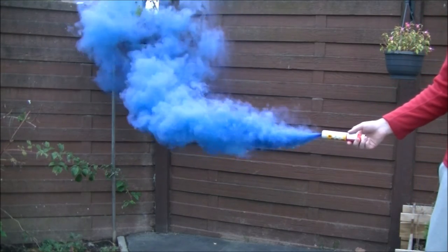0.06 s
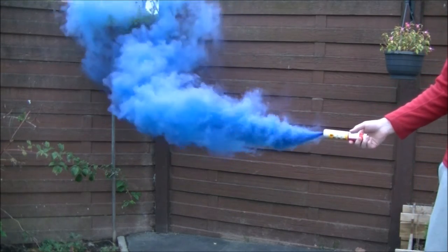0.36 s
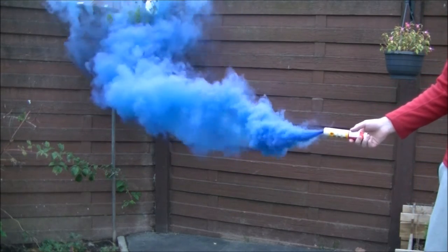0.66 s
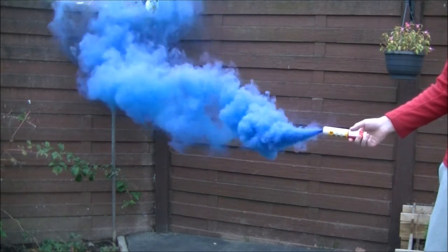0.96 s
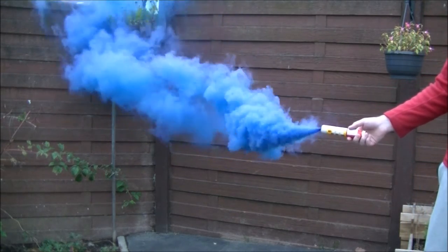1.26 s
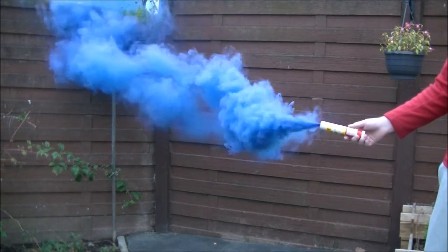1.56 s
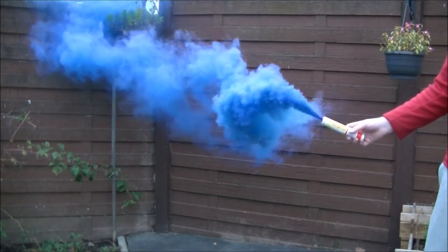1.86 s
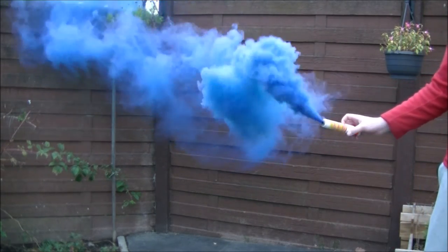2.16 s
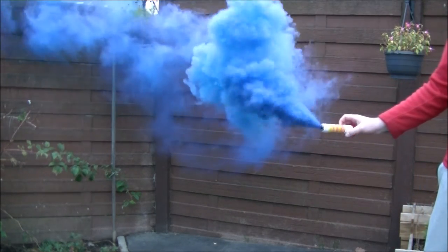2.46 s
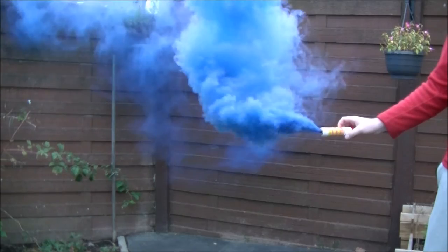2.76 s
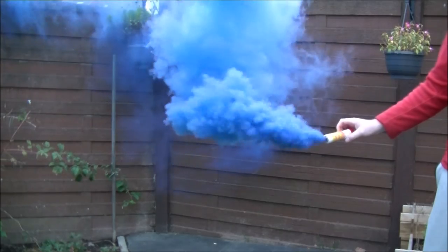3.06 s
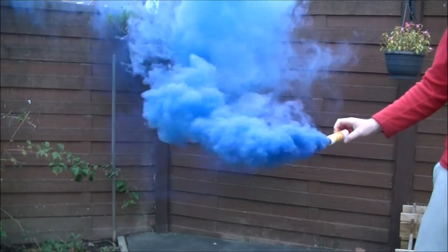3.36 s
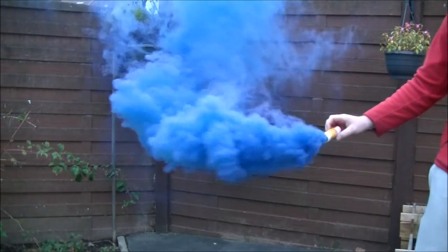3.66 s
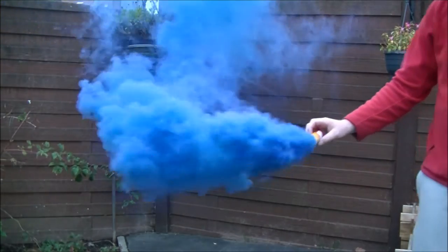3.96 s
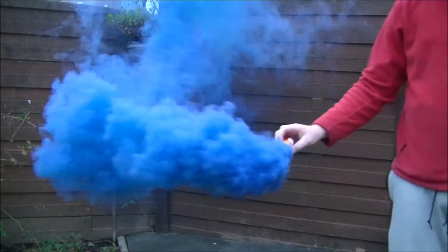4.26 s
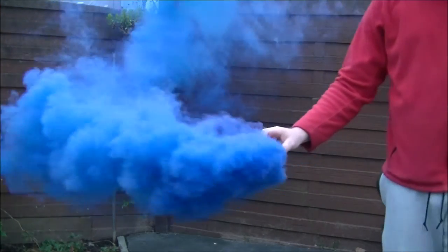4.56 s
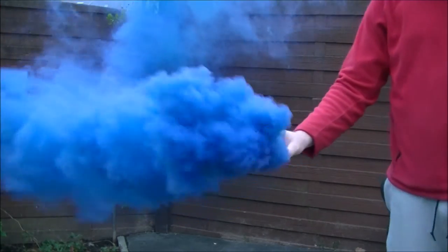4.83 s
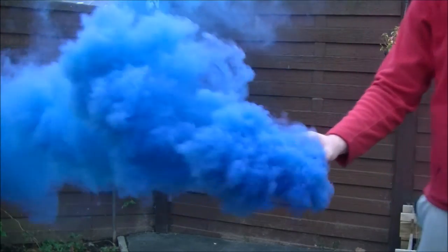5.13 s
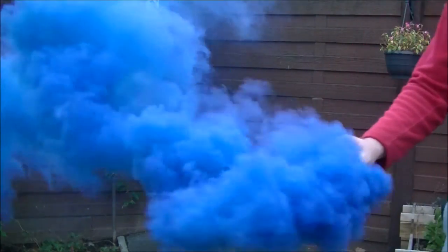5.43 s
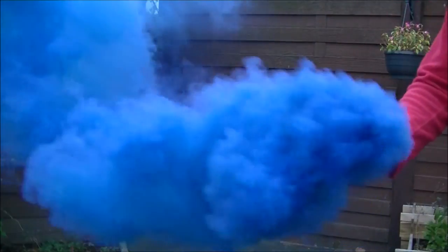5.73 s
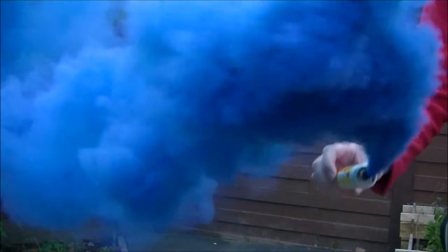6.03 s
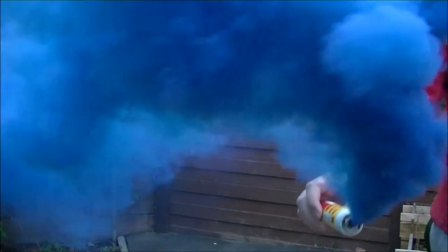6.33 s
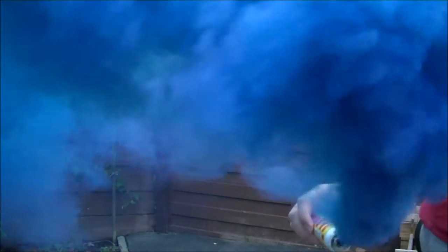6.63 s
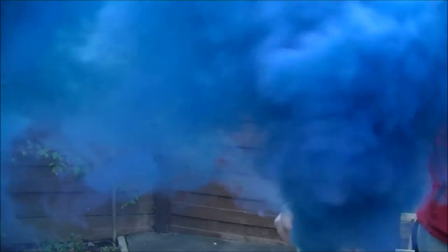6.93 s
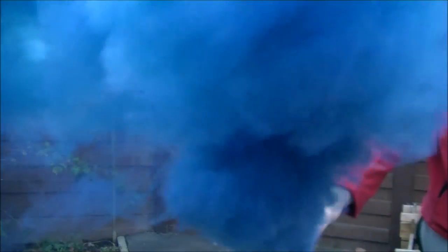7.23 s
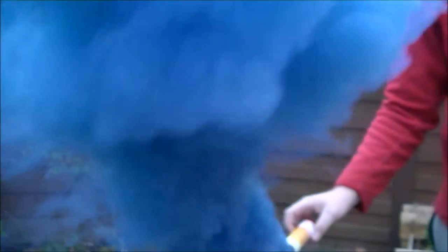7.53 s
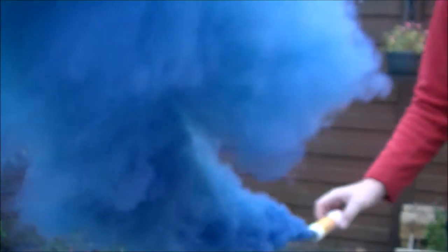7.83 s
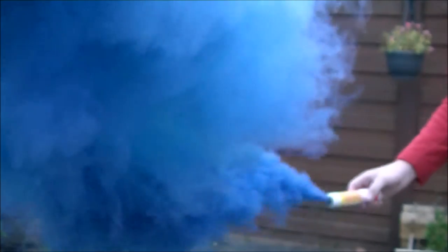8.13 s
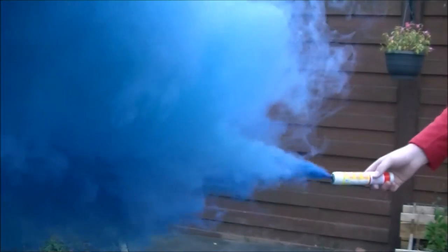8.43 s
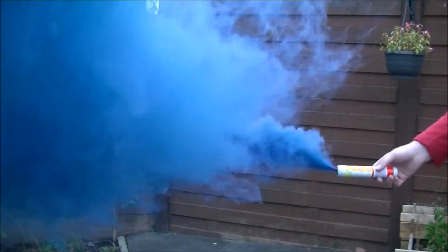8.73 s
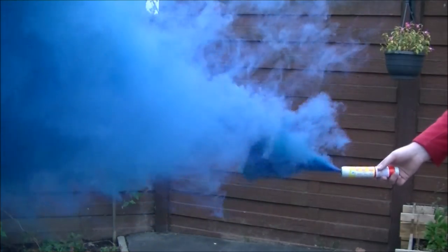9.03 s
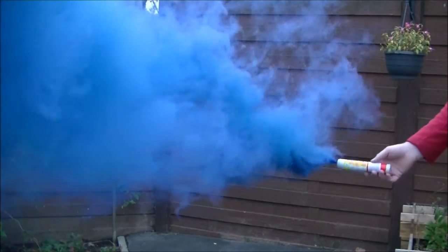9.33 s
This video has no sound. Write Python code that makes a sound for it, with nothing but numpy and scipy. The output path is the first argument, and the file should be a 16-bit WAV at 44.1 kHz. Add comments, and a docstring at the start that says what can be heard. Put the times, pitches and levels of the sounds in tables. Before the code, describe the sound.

The steady, bright hiss of a smoke grenade jetting in a garden, with a slow phasing sweep and a louder close pass.

```python
"""A hand-held smoke grenade jets in a fenced garden, its turbulent plume roaring, its nozzle hissing.
From the start the paving's echo combs the noise into a slow phasing sweep, wooden fences add short
echoes, and far-off cars pull away over a town rumble. The plume billows at 2 s. Swung towards the
microphone, the jet grows louder and spits just before it is closest, at 6 s. On the way back it
billows again, spits once more near 7.8 s and settles to a softer hiss."""
import sys
import numpy as np
from scipy import signal
from scipy.fft import rfft, irfft, next_fast_len
from scipy.io import wavfile
from scipy.ndimage import uniform_filter1d, map_coordinates

SR = 44100
rng = np.random.default_rng(int(sys.argv[2]) if len(sys.argv) > 2 else 0)


def bounce(signal):
    """Save signal as a 16-bit WAV file at the path given by the first command-line argument."""
    frames = np.transpose(np.atleast_2d(signal))
    limited = np.clip(frames, -1, 1)
    pcm = np.round(limited * 32767).astype(np.int16)
    wavfile.write(sys.argv[1], SR, pcm)


N = 422919
TIME = np.arange(N) / SR
SIZE = next_fast_len(N)
FREQ = np.maximum(np.arange(SIZE // 2 + 1) * SR / SIZE, 1)

# the grenade's swing towards the microphone and back: t/s, distance/m
SWING = [(0, 2.81), (1.3, 2.7), (2.1, 2.4), (2.8, 2.52), (3.3, 2.47), (4.4, 1.93), (5.6, 1.17), (6.05, .92),
         (6.9, 1.14), (7.7, 1.6), (9.3, 2.48)]


def amp(db):
    """Decibels to gain."""
    return 10 ** (np.asarray(db) / 20)


def unit(x):
    """Scale to rms 1."""
    return x / np.sqrt(np.mean(x ** 2))


def curves(table):
    """One automation curve for each value column of a time table."""
    times, *columns = np.transpose(table)
    return [np.interp(TIME, times, column) for column in columns]


def across(points):
    """Join (frequency, value) points on a log-frequency axis."""
    hz, value = np.transpose(points)
    return np.interp(np.log(FREQ), np.log(hz), value)


def shape(x, gain):
    """Filter by a gain at each frequency."""
    return irfft(rfft(x, SIZE) * gain, SIZE)[..., :N]


def below(hz, order):
    """Gain of a smooth low-pass."""
    return (1 + (FREQ / hz) ** (2 * order)) ** -.5


def above(hz, order):
    """Gain of a smooth high-pass."""
    return (1 + (hz / FREQ) ** (2 * order)) ** -.5


def noise(gain):
    """Coloured noise of rms 1."""
    return unit(shape(rng.standard_normal(N), gain))


def walk(rate_hz):
    """Smoothed random sample-and-hold of rms 1."""
    hold = max(int(SR / rate_hz), 1)
    steps = rng.standard_normal(N)[np.arange(N) // hold]
    return unit(uniform_filter1d(uniform_filter1d(steps, hold), hold))


def delayed(x, lag_ms):
    """A moving delay: the sound over a path whose length changes."""
    place = np.arange(N) - lag_ms * SR / 1000
    return map_coordinates(x, [place], order=3, mode="wrap")


def aim(usual_level_db=-26, usual_bright_db=-15.5):
    """Jet fader, then roar, edge, sizzle and air offsets, in dB: treble beams, the roar spreads."""
    # the jet as it is swung and aimed: t/s, hiss level/dB, brightness (top treble against hiss)/dB
    jet_moves = [(0.05, -32.5, -12.5), (0.34, -33, -14), (0.52, -31.5, -14.5), (1.79, -31, -12),
                 (2.01, -25.5, -12), (2.19, -27.5, -11.5), (2.54, -26.5, -11.5), (2.56, -28, -11.5),
                 (3.49, -25, -14), (3.78, -27, -14.5), (4.55, -25, -18.5), (4.63, -26, -16.5),
                 (4.86, -23, -17.5), (5.05, -24, -17.5), (5.37, -23, -16.5), (5.63, -23, -20.5),
                 (5.89, -18.5, -10.5), (6.79, -19.5, -19), (7.03, -22, -22), (7.35, -24, -20),
                 (8.25, -23, -13.5), (8.62, -27.5, -13), (9.55, -28, -15)]
    level_db, bright_db = curves(jet_moves)
    distance_m, = curves(SWING)
    loud = level_db - usual_level_db
    bright = bright_db - usual_bright_db
    near = 20 * np.log10(distance_m.mean() / distance_m)
    roar = -.61 * loud - .23 * bright + .19 * near
    edge = .57 * bright
    sizzle = bright + .052 * near
    air = .65 * bright - .33 * near
    return level_db, roar, edge, sizzle, air


def jet(eddy_db=.39, eddy_rate_hz=45, grit_db=2, pivot_hz=4100, beaming=.026):
    """Big eddies roar in the plume, small ones hiss at the nozzle; the treble beams along the jet."""
    # spectrum of the mixing plume: f/Hz, relative level/dB
    plume_eq = [(180, -46), (300, -14.5), (397, -16), (932, -8), (1950, -5.5), (3600, -2.5), (4680, -32),
                (7920, -120)]
    # spectrum of the nozzle: f/Hz, relative level/dB
    nozzle_eq = [(1400, -10), (2000, 1), (2600, -3.5), (3500, -1), (4900, 0.5), (6200, -5.5), (7200, -6),
                 (8000, -14.5), (8900, -20.5), (10100, -17), (11400, -29.5), (12300, -24), (13800, -22.5),
                 (15800, -24)]
    hiss_hz, edge_hz, sizzle_hz, air_hz = 2600, 5800, 7800, 11000  # crossovers: where each band begins
    level_db, roar_aim, edge_aim, sizzle_aim, air_aim = aim()
    nozzle = amp(across(nozzle_eq))
    roar = noise(amp(across(plume_eq)) * above(380, order=2) * below(hiss_hz, order=10))
    hiss = noise(nozzle * above(hiss_hz, order=10) * below(edge_hz, order=20))
    # facing the nozzle, the roar recedes and the hiss tips towards its upper half
    facing = edge_aim - roar_aim
    tilt = above(pivot_hz, order=5) - below(pivot_hz, order=5)
    hiss = hiss + beaming * facing * shape(hiss, tilt)
    edge = noise(nozzle * above(edge_hz, order=20) * below(sizzle_hz, order=40))
    # dye particles in the gas make the very top slightly grainy
    grit = rng.standard_normal(N) * amp(grit_db * rng.standard_normal(N))
    sizzle = unit(shape(grit, nozzle * above(sizzle_hz, order=40) * below(air_hz, order=40)))
    air = unit(shape(grit, nozzle * above(air_hz, order=40)))
    bands = [(roar, roar_aim - 9), (hiss, -.44), (edge, edge_aim - 9),
             (sizzle, sizzle_aim - 18.5), (air, air_aim - 16.5)]
    return amp(level_db) * sum(band * amp(db + eddy_db * walk(eddy_rate_hz)) for band, db in bands)


def echo_paths(nozzle_height_m=1.2, mic_height_m=1.4, sound_m_s=343, falloff=1.15):
    """Lags of the paving and fence echoes, and their gain, all from the grenade's distance."""
    direct_m, = curves(SWING)
    bounced_m = np.sqrt(direct_m ** 2 + 4 * nozzle_height_m * mic_height_m)
    paving_ms = 1000 * (bounced_m - direct_m) / sound_m_s
    fence_ms = 17.2 - 2.7 * direct_m  # shorter with each metre towards the fence
    echo_gain = amp(-3) * (direct_m / bounced_m) ** falloff
    return paving_ms, fence_ms, echo_gain


def reflections(x, corner_ms=3.5):
    """The direct sound plus moving echoes off the paving, the fence, both in turn, and the holder's arm."""
    paving_ms, fence_ms, echo_gain = echo_paths()
    dulled = shape(x, below(8000, order=1))  # rough surfaces give back less treble
    paving = delayed(shape(dulled, above(900, order=1)), paving_ms)
    fence = amp(-5) * delayed(dulled, fence_ms)
    corner = amp(-7) * delayed(dulled, fence_ms + corner_ms)
    arm = amp(-15) * delayed(x, .44 * paving_ms)
    # direct sound and echoes share the power
    return (x + arm + echo_gain * (paving + fence + corner)) / np.hypot(1, echo_gain)


def fence_tail(x, t60_s=.07, send_db=-12.5, width=.45):
    """Slats and plants along the fence scatter the treble into a short stereo tail."""
    _, fence_ms, _ = echo_paths()
    mid, side = rng.standard_normal((2, N)) * amp(-60 * TIME / t60_s)
    tail = mid + width * np.array([side, -side])
    tail /= np.sqrt(np.sum(tail ** 2, axis=1, keepdims=True))
    colour = above(1200, order=1) * below(11000, order=1)
    return amp(send_db) * shape(delayed(x, fence_ms), rfft(tail, SIZE) * colour)


def engine(start_s, length_s, hz, db, climb, fade_s=.11, waver=.0078, flutter_db=.5):
    """A far engine's wavering note fades in, rises by the share `climb` of its pitch and fades out."""
    age = TIME - start_s
    pitch = hz * (1 + climb * (age / length_s - .5)) * (1 + waver * walk(rate_hz=16))
    note = np.sqrt(2) * np.sin(2 * np.pi * np.cumsum(pitch) / SR)
    fade = np.clip(np.minimum(age, length_s - age) / fade_s, 0, 1)
    return fade * amp(db + flutter_db * walk(rate_hz=6)) * note


def traffic(swell_db=1.1, width=.39):
    """Far cars pull away and one engine idles over a bed of town rumble."""
    # climbing engine notes: start t/s, length/s, middle f/Hz, rms level/dB
    cars = [(-.3, 1.5, 252, -57.5), (.3, 1.5, 171, -65), (1.6, 1.4, 191, -61), (1.75, 1.2, 102, -63),
            (3.1, 1.4, 143, -65), (6.1, 3.8, 179, -60.5), (8.5, .9, 275, -59), (8.8, 1.1, 146, -62)]
    # spectrum of the town rumble: f/Hz, relative level/dB
    town_eq = [(20, -27), (35, -19), (48, -8.5), (75, -8), (110, -6.5), (170, 2.5), (260, 2.5), (400, 0),
               (900, 4), (3000, -25.5)]
    # fader of the town rumble: t/s, level/dB
    town_fader = [(0, -46), (2, -47.5), (3, -48), (6, -49.5), (7.1, -47), (9.59, -45)]
    pulling_away = sum(engine(*car, climb=.13) for car in cars)
    idling = engine(start_s=0, length_s=5.6, hz=100, db=-70, climb=0)
    town_db, = curves(town_fader)
    colour = amp(across(town_eq))
    mid = noise(colour)
    side = width * shape(noise(colour), above(60, order=2))  # the deepest rumble stays mono
    rumble = amp(town_db + swell_db * walk(rate_hz=3)) * (mid + np.array([side, -side]))
    return pulling_away + idling + rumble


def billows():
    """As the tube tilts, big slow eddies swell and fade in a throaty band over an octave wide."""
    # swells of the plume: peak t/s, half length/s, centre f/Hz, level/dB
    swells = [(2.03, 0.38, 615, -42), (6.844, 0.33, 1000, -35.5)]
    plume = np.zeros(N)
    for peak_s, half_s, hz, db in swells:
        envelope = amp(db) * np.exp(-((TIME - peak_s) / half_s) ** 2)
        plume += envelope * noise(above(hz, order=2) * below(hz, order=2))
    return plume


def spits():
    """Crumbs of the charge blow through the nozzle in brief, bright bursts."""
    # one burst for each crumb: t/s, level/dB, decay/s
    crumbs = [(5.856, -23, .004), (7.758, -27, .0015)]
    envelope = sum(amp(db) * (TIME >= start_s) * np.exp(-np.abs(TIME - start_s) / decay_s)
                   for start_s, db, decay_s in crumbs)
    return envelope * noise(above(2500, order=3) * below(7000, order=2))


def scene():
    """The grenade, its echoes and the town behind, in stereo."""
    # hiss that reaches the two microphone ports out of step: f/Hz, side level against mid/dB
    side_eq = [(300, -12), (1000, -14), (2000, -20), (5000, -16), (6300, -11), (7300, -12), (8800, -7),
               (10000, -14), (11600, -4), (13000, -7), (15700, -12)]
    # the charge burns a little unevenly and shakes all eddy sizes together
    burn = amp(.25 * walk(rate_hz=35))
    grenade = burn * jet() + billows() + spits()
    side = burn * shape(jet(), amp(across(side_eq)))
    return reflections(grenade) + np.array([side, -side]) + fence_tail(grenade) + traffic()


def record(dry, top_hz=15750):
    """Each microphone port colours and delays the sound in its own way; a steep low-pass cuts the top."""
    # left port against right: f/Hz, level/dB, phase lead/rad
    port_balance = [(60, -0.8, -0.05), (200, -2.9, -0.1), (700, -3.4, 0.18), (1900, -0.3, 0.03),
                    (3300, -4.3, 0.23), (4700, 0.2, 0.52), (5450, -0.5, 0.79), (6300, 8.5, 0.42),
                    (7000, 6.4, -0.48), (8100, -1.2, -0.79), (9500, -1.6, -0.1), (11500, 0.9, 0.14),
                    (14000, 1.6, -0.06), (15700, 0.2, -0.0)]
    hz, balance_db, lead = np.transpose(port_balance)
    left = amp(across(np.c_[hz, balance_db]) / 2) * np.exp(.5j * across(np.c_[hz, lead]))
    ports = np.array([left, 1 / left])
    ports /= np.abs(ports.mean(axis=0))  # keeps a centred sound flat in mono
    high_cut = signal.ellip(12, .1, 90, top_hz, fs=SR, output="sos")
    return signal.sosfilt(high_cut, shape(dry, ports))


dry = scene()
out = record(dry)
bounce(out)
```